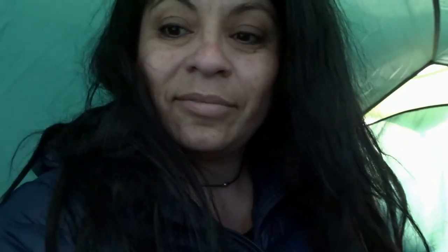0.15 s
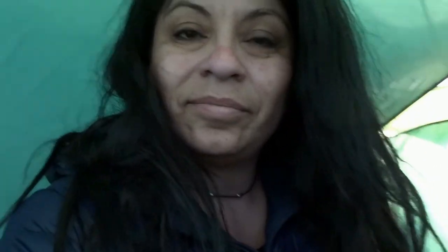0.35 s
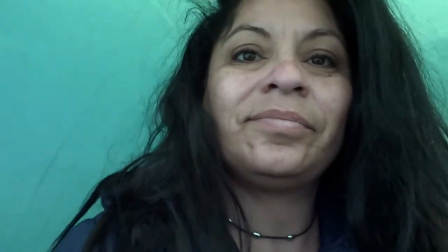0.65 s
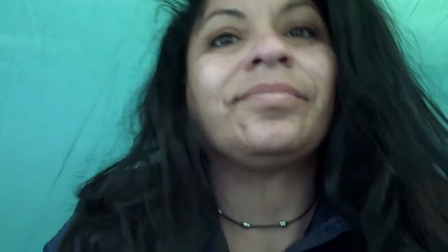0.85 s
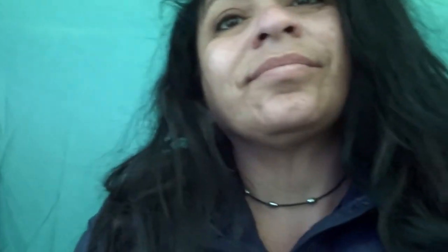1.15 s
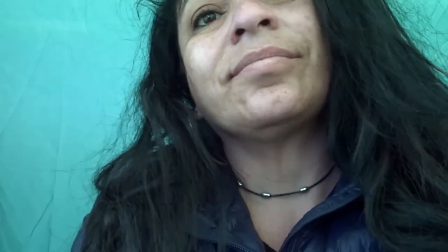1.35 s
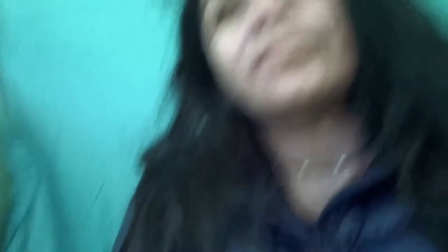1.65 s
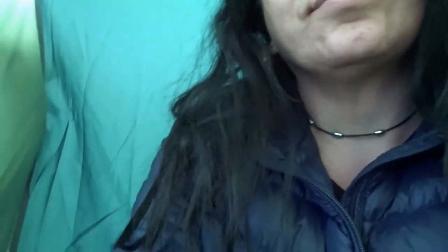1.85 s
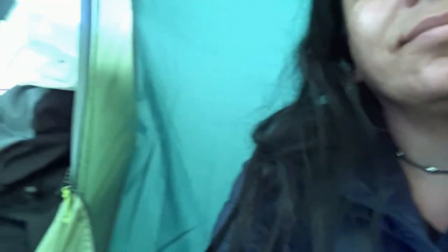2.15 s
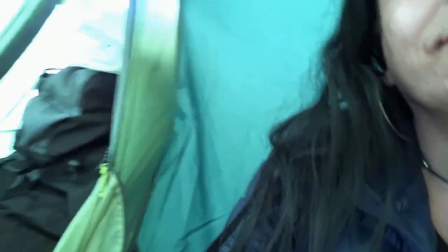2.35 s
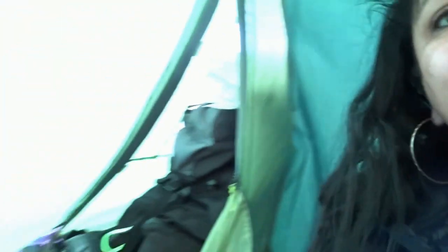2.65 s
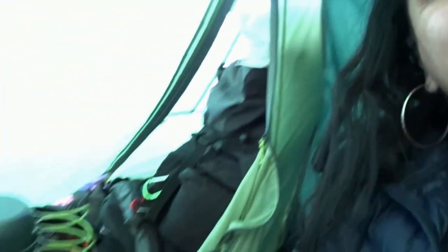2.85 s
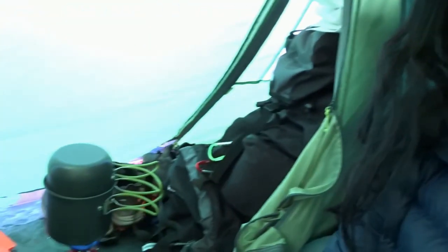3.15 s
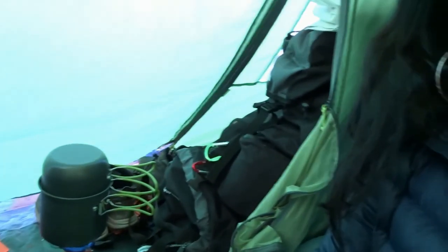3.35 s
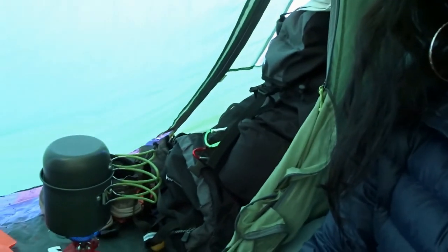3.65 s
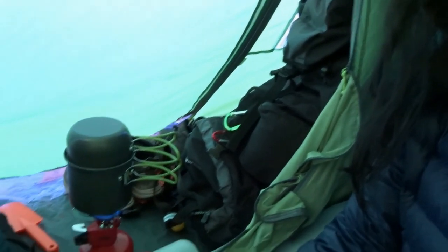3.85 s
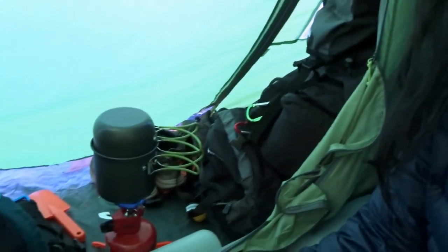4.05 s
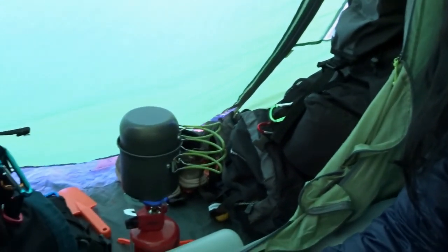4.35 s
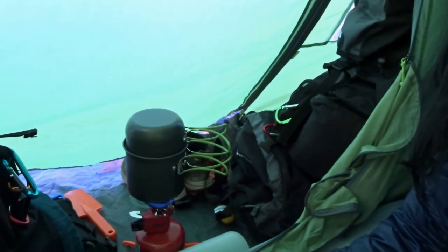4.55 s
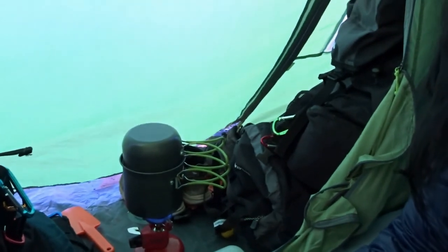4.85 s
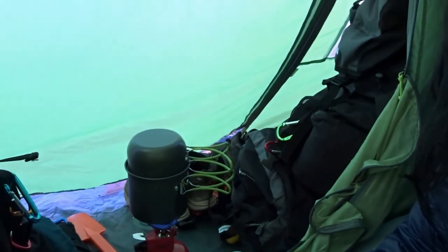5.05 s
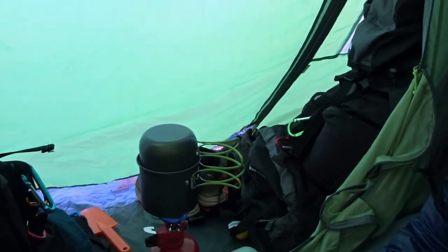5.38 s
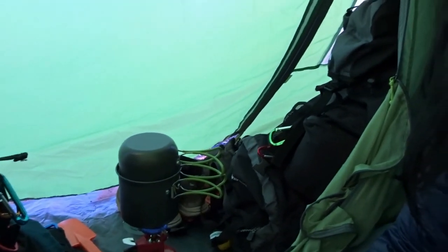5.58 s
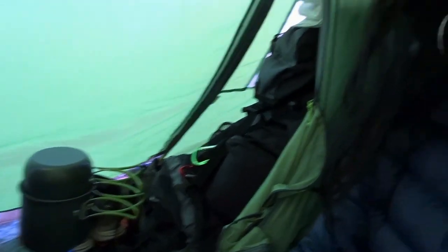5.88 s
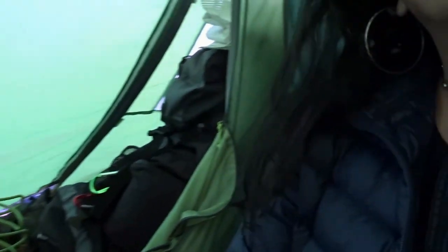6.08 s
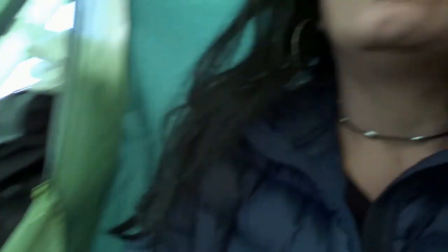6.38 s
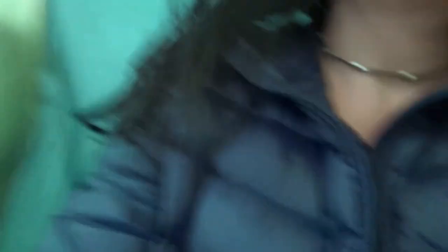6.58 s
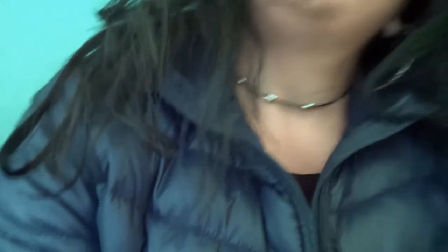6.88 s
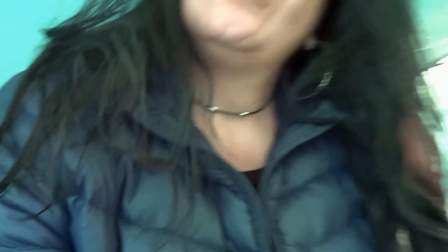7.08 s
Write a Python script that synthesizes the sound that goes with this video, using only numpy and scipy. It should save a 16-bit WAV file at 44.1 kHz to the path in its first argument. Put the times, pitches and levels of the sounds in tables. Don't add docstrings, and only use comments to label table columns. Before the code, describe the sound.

A small gas stove hisses steadily with a thin whistle inside a tent while a nylon jacket rustles and fingers knock and snap a plastic case.

```python
import sys
import numpy as np
from scipy import signal
from scipy.fft import rfft, irfft, next_fast_len
from scipy.io import wavfile

SR = 44100
rng = np.random.default_rng(int(sys.argv[2]) if len(sys.argv) > 2 else 0)


def invert_db(x):
    u = np.asarray(x, float) / 20
    return 10 ** u


def digitize_waveform(pressure):
    field = np.atleast_2d(pressure).T
    bounded = np.clip(field, -1, 1)
    quanta = np.round(bounded * 32767).astype(np.int16)
    wavfile.write(sys.argv[1], SR, quanta)


N = 318344
TIME = np.arange(N) / SR
SIZE = next_fast_len(N)
HZ = np.arange(1, SIZE // 2 + 2) * SR / SIZE
CUTOFF_HZ = 10950

# frequency in Hz, likeness (1 the same, 0 or less
LIKENESS = [(60, 0.8), (170, 0.96), (490, 0.84), (1420, 0.49), (4080, 1), (11700, -1.2)]
# frequency in Hz, likeness (1 the same, 0 or less unrelated).
CLOTH_LIKENESS = [(60, 0.36), (220, 0.94), (840, 0.7), (3130, 0.5), (11700, -0.34)]


def rms_one(x):
    return x / np.sqrt(np.mean(np.abs(x) ** 2) + 1e-20)


def in_time(rows):
    s, *columns = np.transpose(rows)
    return [np.interp(TIME, s, column) for column in columns]


def at_hz(points, hz):
    f, value = np.transpose(points)
    return np.interp(np.log(hz), np.log(np.maximum(f, 1)), value)


def drift(rate_hz):
    r = np.exp(-80 * np.pi * rate_hz / SR)
    white = rng.standard_normal(N // 40 + 2002)
    slow = signal.lfilter([1], [1, -2 * r, r * r], white)[2000:]
    return np.interp(np.arange(N) / 40, np.arange(len(slow)), rms_one(slow - slow.mean()))


def above(db, quiet_db):
    return np.sqrt(np.maximum(invert_db(2 * db) - invert_db(2 * quiet_db), 1e-12))


def pair(source, other, likeness, lag_rad):
    alike = np.clip(likeness, 0, 1)
    right = alike * source * np.exp(-1j * lag_rad) + np.sqrt(1 - alike ** 2) * other
    return np.array([source, right])


def coloured(excite, spectrum, likeness, lag_rad, patchy_db):
    both = pair(*rfft(excite, SIZE), at_hz(likeness, HZ), lag_rad) * invert_db(at_hz(spectrum, HZ))
    out, together = 0, drift(13.0)
    first, last = np.round(2 * np.log2([spectrum[0][0], min(spectrum[-1][0], CUTOFF_HZ)]))
    for step in np.arange(first, last + 1):
        band = np.cos(np.pi / 2 * np.clip(2 * np.log2(HZ) - step, -1, 1)) ** 2
        flicker = invert_db(patchy_db * (0.71 * together + drift(13.7)))
        out = out + flicker * irfft(both * band, SIZE)[:, :N]
    return rms_one(out)


def narrow(hz, width_hz, likeness, lag_rad):
    white = rng.standard_normal((2, N)) + 1j * rng.standard_normal((2, N))
    slow = signal.sosfilt(signal.butter(3, width_hz / 2, fs=SR, output="sos"), white)
    carrier = np.exp(2j * np.pi * np.cumsum(hz + 0 * TIME) / SR)
    return rms_one(np.imag(pair(*slow, likeness, lag_rad) * carrier))


def ring(clicks, hz, t60_s):
    r = invert_db(-60 / (max(t60_s, .002) * SR))
    w = 2 * np.pi * hz / SR
    return signal.lfilter([0, np.sin(w)], [1, -2 * r * np.cos(w), r * r], clicks)


def panned(left, right, pan_db):
    both = np.array([left, right])
    return both / np.abs(both).max() * invert_db([[pan_db / 2], [-pan_db / 2]])


def add(out, s, x):
    i = round(s * SR)
    out[:, i:i + x.shape[1]] += x[:, :N - i]


def crackle(per_s, size_db, share):
    sizes = invert_db(size_db * np.minimum(rng.exponential(1, (2, N)), 5)) * rng.choice([-1, 1], (2, N))
    slips = sizes * (rng.random((2, N)) < per_s * invert_db(5 * drift(12)) / SR)
    return rng.standard_normal((2, N)) + share * rms_one(slips)


def sleeve():
    # time in seconds, level in dB.
    crinkle_rows = [
        (5.38, -77),
        (5.46, -43),
        (5.53, -46),
        (5.571, -38.5),
        (5.67, -41.5),
        (5.71, -46),
        (5.77, -36.5),
        (5.81, -44),
        (5.84, -75),
    ]
    # frequency in Hz, density in dB per Hz.
    crinkle_colour = [(1500, -22), (2800, -5), (3700, -2), (5200, 3), (6500, -6.5), (11000, -13.5)]
    s, db = np.transpose(crinkle_rows)
    level = invert_db(np.interp(TIME, s, db, left=-120, right=-120))
    slips = crackle(900, 3.2, 1.3)
    return level * coloured(slips, crinkle_colour, CLOTH_LIKENESS, HZ / 2200, patchy_db=-2.0)


def fold():
    # start in seconds, length in seconds, level in dB, first Hz, last Hz.
    fold_rows = [
        (0, 0.44, -62.5, 2756, 2650),
        (1.991, 0.054, -47.5, 2330, 2313),
        (2.11, .04, -49.5, 3450, 3406),
        (5.481, 0.24, -57, 1938, 1950),
        (6.298, 0.71, -52.5, 2097, 1521),
    ]
    settle_s, rise_db_s, fall_db_s = .15, 400.5, 399.5
    hz, level_db = np.zeros(N), np.full(N, -120.)
    for s, length_s, db, first_hz, last_hz in fold_rows:
        before_s = np.maximum(s - TIME, 0)
        after_s = np.maximum(TIME - s - length_s, 0)
        now_db = db - rise_db_s * before_s - fall_db_s * after_s
        now_hz = last_hz + (first_hz - last_hz) * np.exp(-np.maximum(TIME - s, 0) / settle_s)
        hz = np.where(now_db > level_db, now_hz, hz)
        level_db = np.maximum(now_db, level_db)
    return invert_db(level_db + 2.9 * drift(35)) * narrow(hz, 304, 0.91, 0.14)


def jacket():
    # time in seconds, speed in dB, nearness of the rubbing in dB.
    rustle_rows = [(0, -58, 7), (.2, -62, 8.5), (.52, -55.5, 2.5), (.9, -50.5, -3), (1.07, -58, 3.5),
                   (1.63, -63, 3), (2.0, -57.5, 0.8), (2.3, -55, 4.5), (2.75, -55.5, -2.5), (3.3, -60, 1.2),
                   (4.2, -62.5, 1.5), (5.2, -62, -1), (5.6, -50.5, 0.5), (5.8, -57, -2.5), (6.2, -54, -6.5),
                   (6.42, -49.5, 0), (6.85, -48, -6), (7.22, -61, 4)]
    # frequency in Hz, density in dB per Hz.
    drag_colour = [(130, -14.5), (280, -4), (480, -3), (800, -6.5), (1200, -29)]
    body_colour = [(600, -24.5), (900, -7), (1300, -8.5), (1800, -3), (2700, -1.5), (3600, 0), (5000, -11)]
    hiss_colour = [(3000, -12.5), (4300, -2.5), (5500, -5.5), (7000, -10.5)]
    sheen_colour = [(4500, -25), (6300, -7), (8000, -7), (11500, -5)]
    body_db, near_db = in_time(rustle_rows)
    faster_db = body_db + 58
    drag_db = -72 + faster_db + near_db
    hiss_db = -55.5 + 0.6 * faster_db + 0.06 * near_db
    sheen_db = -57.5 + .8 * faster_db + 0.21 * near_db

    def layer(gain, slips, colour, lag_rad, patchy_db):
        return gain * coloured(slips, colour, CLOTH_LIKENESS, lag_rad, patchy_db)

    out = layer(invert_db(3.5) * above(drag_db, -75.0), crackle(300, 4.5, 0.41), drag_colour, 0, 0.0)
    out += layer(invert_db(6) * above(body_db, -63.0), crackle(1500, 3, .6), body_colour, HZ / 5000, 2.0)
    out += layer(invert_db(4) * above(hiss_db, -60.0), crackle(700, 2.3, 1.0), hiss_colour, HZ / 2000, 2.5)
    out += layer(invert_db(3) * above(sheen_db, -64.5), crackle(2500, 3, .6), sheen_colour, HZ / 2500, .8)
    return out + fold()


def scuffs():
    # time in seconds, level in dB, rise in seconds, fall in seconds.
    scuff_rows = [
        (3.885, -38, .022, .013),
        (6.91, -47, .012, .012),
        (4.39, -56, .03, .02),
        (5.396, -47, .004, .012),
        (4.04, -55, .03, .05),
    ]
    # frequency in Hz, density in dB per Hz.
    scuff_colour = [(180, -59), (300, -32), (862, -9.5), (1050, -24), (1420, -4), (1860, -13), (2130, -6.5),
                    (3340, -1.5), (11000, -7), (14300, -41), (22000, -120)]
    stroke = 0
    for s, db, rise_s, fall_s in scuff_rows:
        width_s = np.where(TIME < s, rise_s, fall_s)
        stroke = stroke + invert_db(db) * np.exp(-((TIME - s) / width_s) ** 2)
    slips = crackle(1500, 0.97, 1.0)
    return invert_db(5.5) * stroke * coloured(slips, scuff_colour, LIKENESS, HZ / 3000, patchy_db=-2.0)


def thumps(out):
    # time in seconds, peak in dB.
    thump_rows = [
        (1.675, -34),
        (1.692, -37.5),
        (5.562, -48),
        (6.477, -46.5),
        (6.624, -49),
        (6.71, -53),
        (6.905, -44.5),
        (.64, -65),
    ]
    push = np.r_[np.diff(np.hanning(60)), np.zeros(3000)]
    sound = ring(push, 317, 0.039) + 0.26 * ring(push, 404, 0.074)
    for s, db in thump_rows:
        add(out, s, invert_db(db) * panned(sound, sound, 0.93))


def taps(out, rows, ranges_db, main):
    # low Hz, high Hz.
    tap_bands = [(640, 1380), (1300, 2740), (3200, 5430), (6500, 11100)]
    longer = (2.0, 1.19, 0.74, 1.9)
    likeness = (0.76, 0.3, -0.43, 0.0056)
    t = TIME[:2000]
    filters = [signal.butter(2, band, "band", fs=SR, output="sos") for band in tap_bands]
    for (s, db, bright_db, length_s), noise in zip(rows, rng.standard_normal((len(rows), 2, 2000))):
        length_s = np.clip(length_s, .0006, .012)
        levels_db = db + np.array(ranges_db) + bright_db * (np.arange(len(filters)) - main)
        for sos, level_db, stretch, alike in zip(filters, levels_db, longer, likeness):
            slips = noise * (1 - np.exp(-t / 0.0018)) * np.exp(-t / (length_s * stretch))
            left, right = signal.sosfilt(sos, pair(*slips, abs(alike), 0).real)
            add(out, s, invert_db(level_db) * panned(left, np.sign(alike) * right, -0.86))


def knocks(out):
    # start in seconds, level in dB, brightness in dB per range, length in seconds.
    knock_rows = [(.551, -29, 4.5, 0.0031), (0.6375, -27, 2, 0.00097), (1.055, -19.5, -4.5, 0.0012),
                  (1.072, -22.5, 6, 0.0033), (1.114, -36.5, .1, .0027), (1.2493, -29.5, 3, 0.00065),
                  (1.5144, -30.5, 5.5, .0014), (1.6707, -27, 5.5, .0036), (1.6874, -25, -7, 0.002),
                  (1.997, -33, 0, 0.0026), (2.0064, -32, 7, 0.0049), (2.071, -42, -2, 0.0018),
                  (2.518, -32.5, 2, .0028), (2.825, -38.5, 4, 0.0014), (3.187, -36, 3, 0.0016),
                  (3.3327, -32.5, 6.5, 0.0027), (3.911, -26, 3.5, 0.0046), (3.973, -37.5, -5, .0025),
                  (4.442, -37.5, 5.5, 0.0051), (5.165, -37.5, -2, 0.0019), (5.506, -36, 1.5, .0014),
                  (5.559, -24, 2.5, 0.0021), (5.632, -29, -1, 0.0075), (5.803, -35, 3.5, 0.0016),
                  (6.4583, -34, 6, 0.0033), (6.626, -41, -11, .0013), (6.777, -27.5, 3, 0.0027),
                  (6.894, -28.5, -1.5, .0093), (6.91, -29.5, -2.5, .0083), (6.997, -35, 4, 0.0042)]
    taps(out, knock_rows, ranges_db=(-6.5, 0.4, -5.5, -15.5), main=1)


def ticks(out):
    # start in seconds, level in dB, brightness in dB per range, length in seconds.
    tick_rows = [(0.08, -33, 5, 0.0023), (0.088, -30, 1.5, 0.0088), (1.029, -34, -6.5, .0056),
                 (1.064, -28, 7, 0.0017), (1.811, -34, -2, 0.0053), (2.016, -40, -5, .0045),
                 (2.033, -35, 5, 0.0027), (2.04, -38, -6, 0.0062), (2.122, -42, -1, .0015),
                 (2.145, -34, 0, 0.0017), (2.342, -31, -2.5, 0.0013), (2.354, -30, 3, 0.0025),
                 (3.843, -46, -2, .0015), (4.401, -31.5, 0.5, 0.0057), (4.845, -35.5, 2, 0.0029),
                 (5.389, -33, 7.5, .0074), (5.5755, -23.5, 1.2, 0.0056), (5.669, -27.5, 7, .0016),
                 (5.6725, -30.5, 5, 0.0019), (5.7615, -30.5, 0, 0.0029), (5.948, -32, 2, .0018),
                 (6.2924, -30, 0, .0069), (6.475, -36, .1, .0017), (6.639, -26, 5, 0.0068),
                 (6.757, -28.5, -5, 0.0034)]
    taps(out, tick_rows, ranges_db=(-14, -4, 4, -13.5), main=1.64)


def snaps(out):
    # time in seconds, peak in dB, left-right difference in dB.
    snap_rows = [
        (1.0495, -6, -1.5),
        (2.2283, -9.5, 0),
    ]
    # frequency in Hz, level in dB, t60 in seconds.
    case_modes = [(780, -2, .016), (2340, -4.5, 0.024), (2650, -6, 0.014), (3260, -12, 0.023),
                  (4140, 2, 0.0076), (4270, -1.5, 0.0087), (5510, -2, 0.012), (7000, -37, 0.0054),
                  (8800, -14, 0.0049)]
    t = TIME[:4000]
    no_bass = signal.butter(3, 1500, "high", fs=SR, output="sos")
    for (s, db, pan_db), noise in zip(snap_rows, rng.standard_normal((len(snap_rows), 2, 4000))):
        blow = 0.2 * noise * np.exp(-t / 0.0035)
        blow[0, [0, 10, 135]] += [.5, .9, .3]
        blow[1, [2, 13, 57, 140]] += [0.27, 0.67, 0.73, 0.28]
        blow = signal.sosfilt(no_bass, blow)
        left, right = (sum(invert_db(mode_db) * ring(side, hz, t60_s) for hz, mode_db, t60_s in case_modes)
                       for side in blow)
        add(out, s, invert_db(db) * panned(left, right, pan_db))


def stove():
    # time in seconds, lower jet band in Hz, jet level in dB, facing the stove (0
    turn_rows = [(0.0, 3850, -60, 0.4), (0.4, 3750, -64, 0.24), (0.7, 3700, -57, 0), (1.0, 3720, -53, .1),
                 (1.5, 3650, -56, 0.16), (1.75, 3600, -53, .1), (2.2, 3720, -59, 0.39),
                 (2.45, 3650, -51, 0.01), (2.7, 3720, -51.5, .4), (2.95, 3750, -50, .6),
                 (3.3, 3570, -55.5, 0.7), (4.0, 3543, -52, 0.81), (4.8, 3530, -53, .9),
                 (5.6, 3680, -51.5, 1.1), (6.0, 3680, -50.5, 0.41), (6.4, 3650, -48.5, .3),
                 (6.65, 3580, -53, .2), (7.22, 3690, -61.5, 0)]
    # frequency in Hz, density in dB per Hz.
    hiss_colour = [(30, -34), (120, -32), (250, -22.5), (560, -34), (800, -29), (1300, -25), (1800, -31),
                   (2500, -23), (3100, -23), (3800, -12), (4600, -15.5), (5500, -17), (7600, -28),
                   (11000, -31.5)]
    # frequency in Hz, width in Hz, level in dB.
    whistle_rows = [(317, 100, -78), (793.4, 156, -69), (2404, 210, -70.5), (4175, 79, -65),
                    (4810, 87, -63), (5020, 104, -63.5), (5770, 220, -61)]
    # frequency in Hz, phase in radians by which the left port leads.
    lag_rows = [(0, 0), (3530, 0.5), (4130, 0.74), (4570, 1.26), (4910, 2.0), (5340, 0.8), (5940, 4),
                (6800, 23), (7060, 8), (8180, -2), (8790, 2), (9220, 0.7), (9730, 2.8), (11900, -0.1)]
    low_hz, high_db, facing = in_time(turn_rows)
    high_hz = 4157 - 60 * facing
    low_db = high_db - 5 + 5 * facing
    turn_lag_rad = 2.43 - 1.3 * facing
    lag_hz, lag_rad = np.transpose(lag_rows)

    swell = invert_db(0.51 * (high_db - np.mean(high_db)))
    white = rng.standard_normal((2, N))
    hiss = coloured(white, hiss_colour, LIKENESS, np.interp(HZ, lag_hz, lag_rad), patchy_db=1.5)
    out = invert_db(-51) * swell * hiss
    for hz, width_hz, level_db in whistle_rows:
        flicker = invert_db(1.8 * drift(1.5))
        out += invert_db(level_db) * flicker * narrow(hz, width_hz, 0.63, np.interp(hz, lag_hz, lag_rad))

    low_gain = invert_db(np.minimum(low_db, -49) - 1.5 + 1.3 * drift(18))
    high_gain = invert_db(np.minimum(high_db, -49) + 1.5 + 1.2 * drift(18))
    out += low_gain * narrow(low_hz, 150, 0.95, 0.55 * turn_lag_rad)
    return out + high_gain * narrow(high_hz, 260, 0.99, turn_lag_rad)


def scene():
    out = sleeve() + jacket() + scuffs() + stove()
    thumps(out)
    knocks(out)
    ticks(out)
    snaps(out)
    return out * invert_db([[-.3], [.3]])


def top_cut(x):
    return signal.sosfilt(signal.butter(12, 12310, fs=SR, output="sos"), x)


def record(dry):
    splice_s, fade_in_s = 0.473, 0.021
    dry = signal.sosfilt(signal.butter(4, 130, "high", fs=SR, output="sos"), dry)
    fade = np.clip(0.076 + (TIME - splice_s) / fade_in_s, 0, 1)
    dry = dry * np.where(TIME < splice_s, 1, fade)
    dry = signal.sosfilt(signal.ellip(10, .5, 75, CUTOFF_HZ, fs=SR, output="sos"), dry)
    return top_cut(dry)


dry = scene()
out = record(dry)
digitize_waveform(out)
```